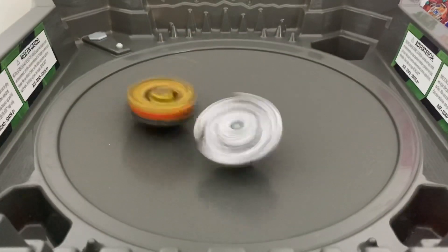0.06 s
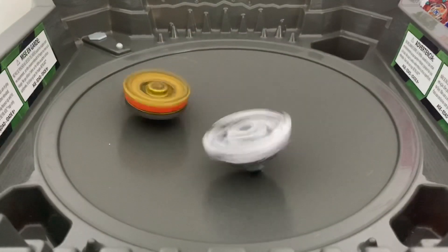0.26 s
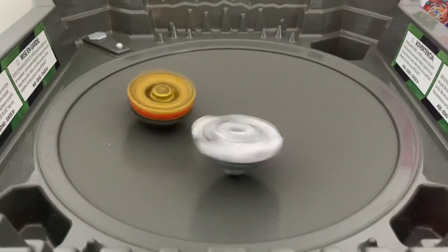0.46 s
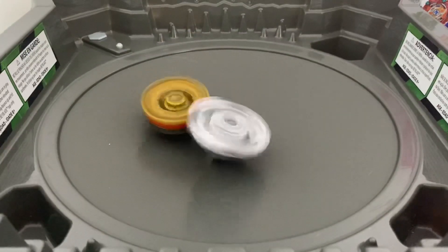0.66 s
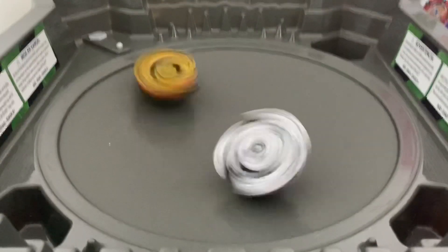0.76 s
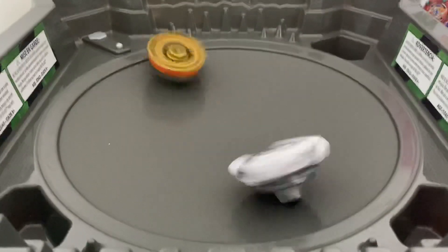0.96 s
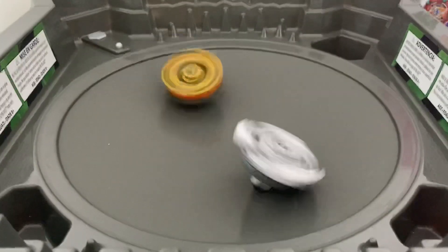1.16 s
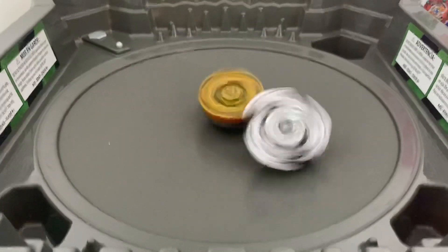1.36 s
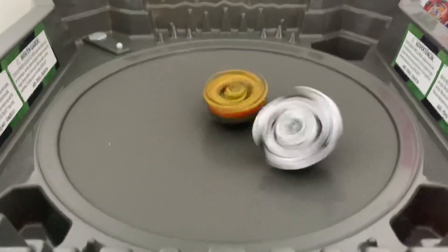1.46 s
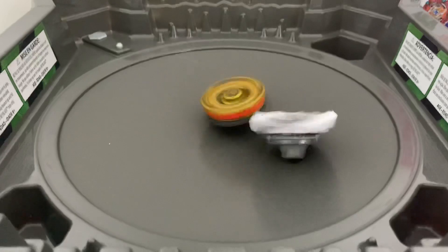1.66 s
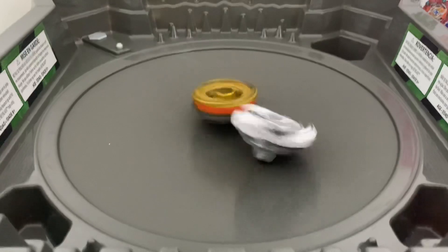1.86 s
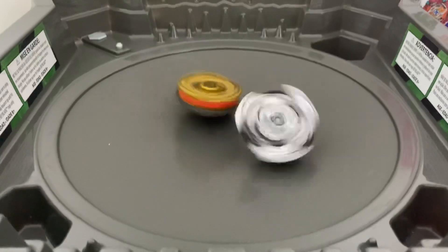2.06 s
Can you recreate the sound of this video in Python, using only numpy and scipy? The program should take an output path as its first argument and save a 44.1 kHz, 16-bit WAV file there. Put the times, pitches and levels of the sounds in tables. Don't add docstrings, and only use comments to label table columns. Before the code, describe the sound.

Two plastic spinning tops collide with a sharp crack at once, then rattle and skid lightly before harder, more frequent clacks in the second half; close phone microphone, hollow plastic bowl, small quiet room.

```python
import sys
import numpy as np
from scipy import signal
from scipy.fft import rfft, irfft, next_fast_len
from scipy.io import wavfile
from scipy.ndimage import uniform_filter1d

SR = 44100
rng = np.random.default_rng(int(sys.argv[2]) if len(sys.argv) > 2 else 0)


def elevation(decibels):
    levels = np.asarray(decibels, float)
    return 10 ** (levels / 20)


def unload_wav(signal):
    wavfile.write(
        sys.argv[1],
        SR,
        np.round(np.clip(np.atleast_2d(signal).T, -1, 1) * 32767).astype(np.int16),
    )


N = 93095

# (frequency [Hz], level [dB], t60 [s])
RIM_MODES = [(2536, -12.5, 0.0034), (3560, -4.5, 0.0057), (4139, -7, 0.017), (4870, -7, 0.0093),
             (5534, -7.5, 0.0038), (6210, -21, 0.019), (6944, -1, 0.0031), (7550, -4, 0.009),
             (8406, 0.5, 0.006), (9700, 5, 0.0091), (11156, 7, 0.0061), (11500, -18.5, 0.0049),
             (12820, 4, 0.012), (14330, -5.5, 0.044)]
# (time [s], level [dB], hollow share [dB], hiss share [dB])
TIP_PRESSURE = [(0, -35, 6.5, 0.5), (0.049, -43, -2.5, 10.5), (0.098, -56, 2, -3), (0.261, -47, -8, -8),
                (.38, -61, -0.5, -32), (.66, -56.5, 2, -17), (.7, -48, 7, -5), (.93, -47.5, 5.5, -3.5),
                (1.048, -52, 1.5, -16), (1.149, -34.5, 0.5, -9.5), (1.28, -40, 4.5, -2.5),
                (1.388, -39.5, 11.5, 5.5), (1.437, -46.5, 4, -1), (1.62, -43, -5, -0.5),
                (1.704, -42, 4.5, 7), (1.86, -61.5, 2, -23), (1.902, -43, 1.5, 1),
                (2.062, -59.5, -6, -18.5)]


def shape(table, size, log=True):
    hz, value = np.array(table).T
    bins = np.maximum(np.arange(size // 2 + 1) * SR / size, 1)
    if log:
        return np.interp(np.log(bins), np.log(hz), value)
    return np.interp(bins, hz, value)


def unit(x):
    return x / np.sqrt(np.mean(x ** 2))


def decay(t, t60):
    return np.exp(-np.log(1000) * t / t60)


def through(x, response):
    return signal.fftconvolve(x, response)[:N]


def ring(modes, length, detune, scatter_db):
    t = np.arange(int(length * SR))[:, None] / SR
    hz, db, t60 = np.array(modes).T
    level_draw, pitch_draw, sign_draw = rng.standard_normal((3, len(hz)))
    level = np.sign(sign_draw) * elevation(db + scatter_db * level_draw)
    tones = level * np.sin(2 * np.pi * hz * (1 + detune * pitch_draw) * t) * decay(t, t60)
    y = tones.sum(axis=1)
    return y / np.sqrt(np.sum(y ** 2))


def body(x, modes, length, detune, scatter_db, count=6):
    spot = rng.integers(0, count, N)
    return sum(through(x * (spot == k), ring(modes, length, detune, scatter_db)) for k in range(count))


def grains(per_s, spread_db):
    chance, sign, size = rng.random((3, N))
    clicks = (chance < per_s / SR) * np.sign(sign - .5)
    return unit(clicks * elevation(-spread_db * np.log(size + .03)))


def walk(rate):
    hold = int(SR / rate)
    steps = np.repeat(rng.standard_normal(N), hold)[:N]
    return unit(uniform_filter1d(steps, hold // 2))


def struck(rows, db, rise_s, shift, t60=None):
    t, out = np.arange(SR // 8) / SR, np.zeros(N + SR)
    for s, peak_db, hz, *own in rows:
        phase = 2 * np.pi * hz * shift * t
        fade = (1 - np.exp(-t / rise_s)) * decay(t, t60 or own[0])
        i = int(s * SR)
        out[i:i + len(t)] += elevation(peak_db + db) * (np.sin(phase) + .5 * np.sin(.97 * phase)) * fade
    return out[:N]


def rim_blows():
    # (time [s], peak level [dB], bowl share [dB], weight of the lower rim modes [dB])
    blows = [(.0005, -13.5, -32, 0.5), (.0056, -35, -29, 2), (0.0167, -10.5, -38, 3),
             (0.0349, -3, -23, -10.5), (0.0363, -4, -40, -10), (0.142, -23, -20, -8),
             (0.6805, -2, -41, 0.5), (0.6834, -6.5, -28, -4.5), (0.6844, -1.5, -53, -22.5),
             (1.2920, -6, -34, -10.5), (1.2935, -18.5, -10, -8), (1.3267, 0, -29, -12),
             (1.3294, -5, -53, 1.5), (1.333, -2, -42, -7), (1.3566, -8.5, -29, -21),
             (1.6778, -3.5, -29, -2.5), (1.6794, -3.5, -30, -15), (1.6828, -4.5, -26, -27),
             (1.8834, -6.5, -27, -5.5), (1.8848, -2, -52, -2.5), (1.8864, -17, -10.5, 15),
             (1.895, -17, -39, 11.5), (1.9124, -14.5, -48, 5.5), (2.106, -35, -7, 1)]
    blow_db, crack_db, crack_s = 1, -15, 0.00075
    swell_db, swell_s = -29.5, 0.0072
    thump_db, thump_late_s = -34.5, 0.0041
    lower_hz = 5500
    rim, push, thump = np.zeros((3, N + SR))
    t = np.arange(int(.04 * SR)) / SR
    for s, db, bowl_db, lower_db in blows:
        modes = [(hz, level + lower_db * (hz < lower_hz), t60) for hz, level, t60 in RIM_MODES]
        tone = ring(modes, .04, detune=.02, scatter_db=4)
        noise, swell_noise = rng.standard_normal((2, len(t) + 1))
        crack = np.diff(noise) * np.exp(-t / crack_s) / 2
        swell = uniform_filter1d(swell_noise[1:], size=2) * np.exp(-t / swell_s)
        i = int(s * SR)
        rim[i:i + len(t)] += elevation(db + blow_db) * (tone / np.abs(tone).max() + elevation(crack_db) * crack)
        rim[max(i - len(t), 0):i] += elevation(db + swell_db) * swell[:i][::-1]
        push[i] += elevation(db + bowl_db) * 10
        thump[i + int(thump_late_s * SR)] += elevation(db + thump_db) * 20
    return rim[:N], push[:N], thump[:N]


def rim_clacks(shift):
    # (time [s], peak level [dB], frequency [Hz])
    clacks = [(.2364, -34, 2070), (.24, -39, 4720), (.2568, -30, 2056), (.4184, -41.5, 2210),
              (.6804, -18.5, 3404), (.6834, -27.5, 3970), (.6815, -21, 2890), (.9602, -31, 3040),
              (1.0136, -39, 1840), (1.2281, -23.5, 2130), (1.3079, -22.5, 2080), (1.3264, -21, 3600),
              (1.5723, -31, 1960), (1.6377, -29, 2000), (1.6791, -21, 3700), (1.68, -32.5, 556),
              (1.8831, -21, 3520), (1.8838, -14, 6766), (2.0118, -38, 3760)]
    return struck(clacks, -1.5, .00037, shift, t60=.0193)


def rattle():
    starts = [.158, .2364, .281, .410, .496, .528, .617, .711, .7946, .826, .886, .903, .9188, .9602, .9966,
              1.0141, 1.066, 1.1209, 1.132, 1.1822, 1.2136, 1.228, 1.306, 1.4157, 1.4735, 1.5404, 1.5898,
              1.637, 2.012, 2.066, .316, .468, .561]
    # (rim level [dB], bowl level [dB], hollow level [dB], fade time [s])
    skids = [(-30, -32, -37, 0.011), (-32, -32.5, -37.5, 0.0114), (-40, -49.5, -54.5, 0.028),
             (-47, -42.5, -46.5, 0.011), (-58, -45.5, -51, 0.0073), (-60, -51.5, -53, 0.014),
             (-35, -36, -42, 0.0078), (-26.5, -30, -28, 0.012), (-32.5, -30.5, -29, 0.015),
             (-28.5, -68, -38, 0.0038), (-29, -31, -36, .012), (-21, -29.5, -34, 0.0078),
             (-25, -40, -26, 0.0074), (-23.5, -30, -42, 0.0086), (-31, -28.5, -61, 0.0022),
             (-28, -32.5, -57, 0.012), (-31.5, -37.5, -50, 0.024), (-27, -30, -36.5, 0.0055),
             (-27, -42.5, -33, 0.027), (-21, -43, -32, 0.0053), (-23.5, -30, -16, 0.0028),
             (-21, -40, -31, 0.017), (-15, -20.5, -21.5, 0.013), (-20.5, -57, -36, 0.0033),
             (-25.5, -30, -32, 0.0304), (-28, -42, -31, 0.011), (-56, -37.5, -44, 0.037),
             (-31, -51, -50, 0.034), (-38.5, -33.5, -25.5, 0.003), (-43.5, -39.5, -37.5, .012),
             (-40.5, -39.5, -43.5, 0.009), (-50.5, -43, -54, 0.011), (-55, -46, -51, 0.01)]
    trim_db = np.array([-5.5, -4.5, -1.5])
    t, drive = np.arange(N) / SR, np.zeros((3, N))
    knocks = grains(2300, 4)
    knocks[(np.array(starts) * SR).astype(int) + 1] = 3
    for s, (*levels_db, length) in zip(starts, skids):
        fade = (t >= s) * np.exp(-np.maximum(t - s, 0) / length)
        drive += elevation(np.array(levels_db) + trim_db)[:, None] * fade
    return drive * knocks


def tip_skid():
    s, db, _, _ = np.array(TIP_PRESSURE).T
    wobble_hz, wobble_db = 24.92, 3.5
    press = elevation(np.interp(np.arange(N) / SR, s, db) + wobble_db * walk(wobble_hz))
    return press, press * grains(1200, 3)


def tip_hiss(press):
    s, _, _, hiss_db = np.array(TIP_PRESSURE).T
    return press * elevation(np.interp(np.arange(N) / SR, s, hiss_db)) * grains(2500, 4.5)


def tip_scrape():
    s, db, low_db, _ = np.array(TIP_PRESSURE).T
    return elevation(np.interp(np.arange(N) / SR, s, db + low_db) + 2.3 * walk(18)) * grains(760, 3.86)


def bowl_floor(drive):
    # (frequency [Hz], level [dB], t60 [s])
    floor_modes = [(712.4, 1.5, 0.065), (847, 7.5, 0.036), (1014, 1.5, 0.086), (1177, 12, 0.024),
                   (1271, 4.5, 0.041), (1451, 9.5, 0.023), (1715, 6.5, 0.027), (2105, 13.5, 0.0094),
                   (505, -7.5, 0.033)]
    high = signal.butter(3, 454, "high", fs=SR, output="sos")
    return signal.sosfilt(high, body(drive, floor_modes, .12, .03, 3.0))


def tip_knocks(shift):
    # (time [s], peak level [dB], frequency [Hz], t60 [s])
    knocks = [(0.157, -30.5, 1250, 0.05), (0.238, -30, 1350, 0.066), (0.28, -36, 1357, 0.05),
              (0.314, -43, 1198, 0.085), (0.38, -49, 870, 0.05), (0.404, -49, 868, 0.077),
              (0.421, -36, 1204, 0.06), (0.471, -43, 1190, 0.056), (0.529, -46, 912, 0.05),
              (0.561, -49, 1070, 0.042), (0.622, -37, 1130, 0.065), (0.71, -34, 1124, 0.05),
              (0.797, -38, 1168, 0.045), (0.865, -37, 1060, 0.062), (0.889, -34, 1150, 0.05),
              (0.912, -31.5, 1124, 0.087), (1.272, -29, 1330, 0.05), (1.292, -26, 1130, 0.043),
              (1.305, -31, 1160, 0.042), (1.35, -22.5, 1256, 0.063), (1.471, -32, 1327, 0.057),
              (1.642, -24, 867, 0.061), (1.664, -21.5, 1390, 0.032), (1.887, -25.5, 845, 0.03)]
    return struck(knocks, -3, .0015, shift)


def hollow_underside(drive):
    # (frequency [Hz], level [dB], t60 [s])
    hollow_modes = [(60, -27, 0.087), (84, 0.5, 0.034), (113.7, 4, 0.1), (146.3, -6, 0.11),
                    (181.8, -3.5, 0.091), (232, -4, .1), (279.7, -1.5, 0.086)]
    low = signal.butter(2, (102, 380), "band", fs=SR, output="sos")
    return signal.sosfilt(low, body(drive, hollow_modes, .3, .02, 1.5, count=2))


def bumps_below(shift):
    # (time [s], peak level [dB], frequency [Hz])
    bumps = [(0.162, -40.5, 122.5), (0.239, -40, 159), (0.615, -45, 144), (0.681, -24, 166),
             (0.719, -25, 115), (0.867, -31, 130), (0.903, -23.5, 294), (1.07, -31.5, 297),
             (1.13, -37, 298), (1.209, -23.5, 142), (1.291, -18, 162), (1.351, -18.5, 115.4),
             (1.478, -39, 122.6), (1.641, -33, 245), (1.672, -31, 252), (1.72, -38, 165),
             (1.89, -26.5, 116), (1.982, -28, 135)]
    return struck(bumps, -4, .0019, shift, t60=.082)


def smear(x, db, t60, count=3):
    # (frequency [Hz], level [dB])
    colour = [(450, -58), (800, -7.5), (1200, -15.5), (3000, 6.5), (7000, 4.5), (10000, -7.5),
              (14000, -16.5), (16500, 0.5)]
    place = np.repeat(rng.integers(0, count, N // 2048 + 1), 2048)[:N]
    size, out = SR // 2, 0
    for k in range(count):
        noise = irfft(rfft(rng.standard_normal(size)) * elevation(shape(colour, size)), size)
        tail = noise * decay(np.arange(size) / SR, t60)
        out = out + through(x * (place == k), tail / np.sqrt(np.sum(tail ** 2))) * elevation(db)
    return out


def room_tone():
    # (frequency [Hz], level [dB])
    colour = [(18, -74), (30, -49), (100, 30.5), (569, -23), (1160, -72), (1860, -48), (2230, 15.5),
              (8300, -2), (16000, -64)]
    return unit(irfft(rfft(rng.standard_normal(N)) * elevation(shape(colour, N)), N)) * elevation(-65)


def two_ports(common, differing):
    # (frequency [Hz], phase [rad])
    lead = [(500, 0), (1200, .5), (1700, 3.1), (2600, 4.5), (3400, 8.5), (4050, 3 * np.pi),
            (16500, -2.4 * np.pi)]
    # (frequency [Hz], share [ratio])
    width = [(30, 1.5), (70, .45), (150, .35), (300, .2), (600, .7), (2500, .8), (5000, .5), (7500, .3)]
    size, side = next_fast_len(N + 4096), np.array([[1], [-1]])
    mid = rfft(common, size)
    other = 1j * rfft(differing, size) * shape(width, size)
    left_db = shape([(100, 2.5), (2500, 2.5), (4500, -1.0), (9000, -0.6)], size)
    lean = elevation(left_db * side / 2)
    turn = np.exp(.5j * shape(lead, size, log=False) * side)
    return irfft((mid + side * other) * lean * turn, size)[:, :N]


def scene():
    press, skid = tip_skid()
    hits, push, thump = rim_blows()
    tick_rim, tick_bowl, tick_hollow = rattle()
    rim = hits + body(tick_rim + tip_hiss(press), RIM_MODES, .03, .05, 3.0)
    floor_drive = skid + push + tick_bowl
    hollow_drive = tip_scrape() + tick_hollow + thump
    heard = []
    for shift in (1, 1.03):
        upper = bowl_floor(floor_drive) + tip_knocks(shift) + rim_clacks(shift)
        hollow = hollow_underside(hollow_drive) + bumps_below(shift)
        walls = smear(rim + upper, db=-2, t60=.032)
        room = smear(rim + upper, db=-12, t60=.43)
        heard.append(upper + hollow + walls + room + room_tone())
    return two_ports(heard[0] + rim, heard[1])


def band_limit(x):
    return signal.sosfilt(signal.butter(12, 16960, fs=SR, output="sos"), x)


def record(dry):
    # (frequency [Hz], level [dB])
    colour = [(12200, 0), (13000, -5), (14400, -12), (15300, 5), (16200, -3)]
    coloured = irfft(rfft(dry) * elevation(shape(colour, N)), N)
    top_cut = signal.ellip(8, .2, 70, 16050, fs=SR, output="sos")
    mix = signal.sosfilt(top_cut, coloured)
    return band_limit(mix)


dry = scene()
out = record(dry)
unload_wav(out)
```